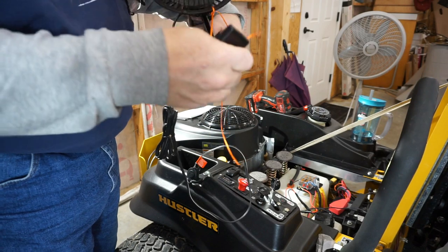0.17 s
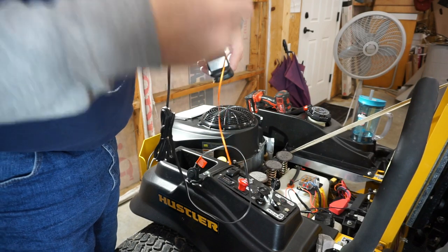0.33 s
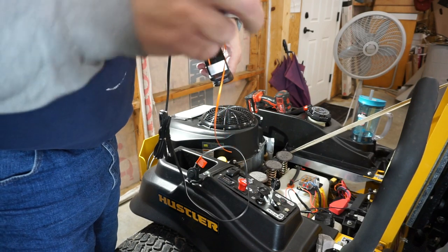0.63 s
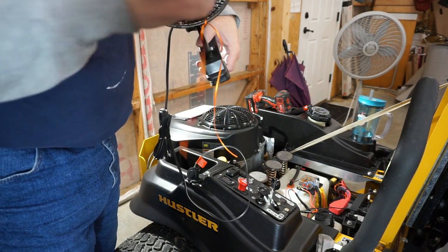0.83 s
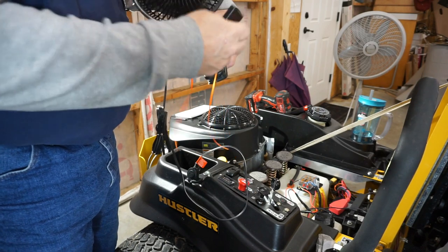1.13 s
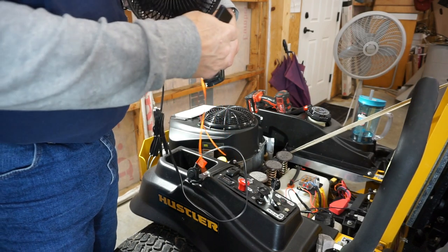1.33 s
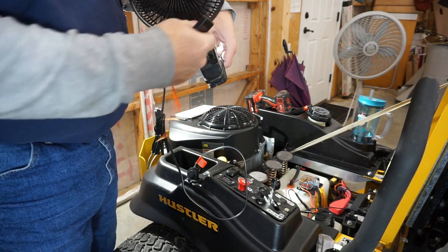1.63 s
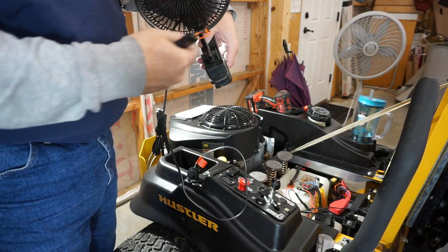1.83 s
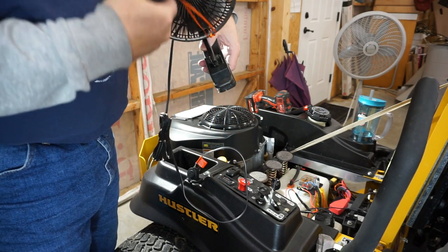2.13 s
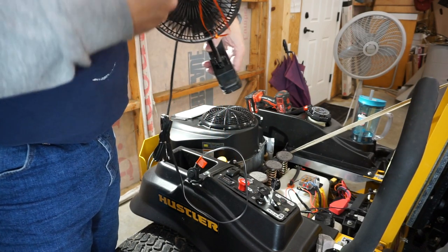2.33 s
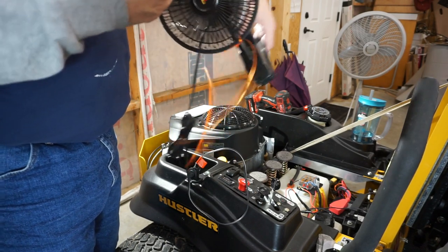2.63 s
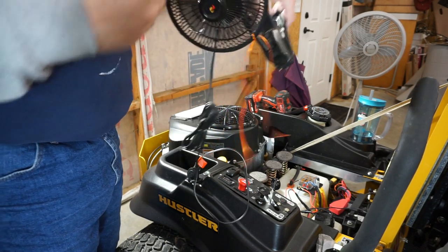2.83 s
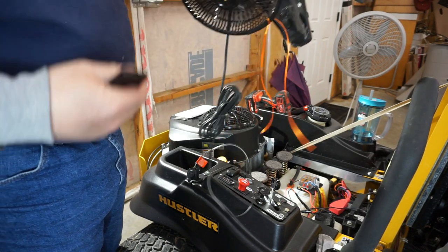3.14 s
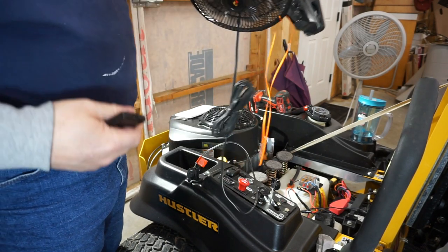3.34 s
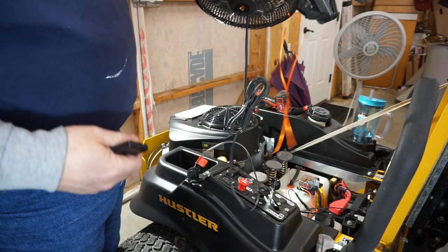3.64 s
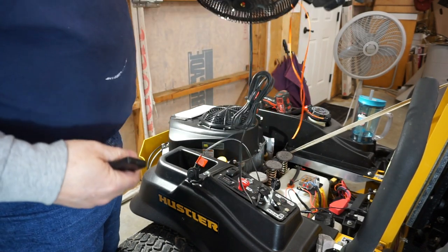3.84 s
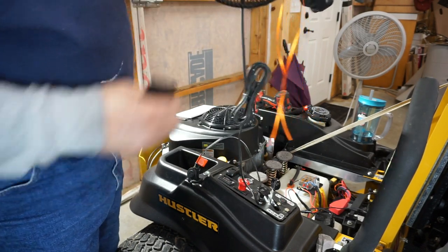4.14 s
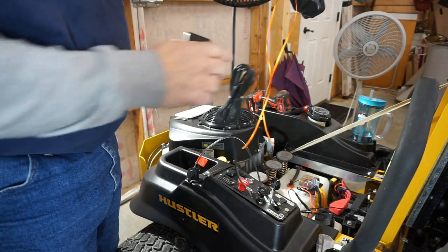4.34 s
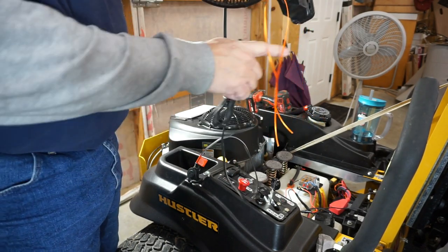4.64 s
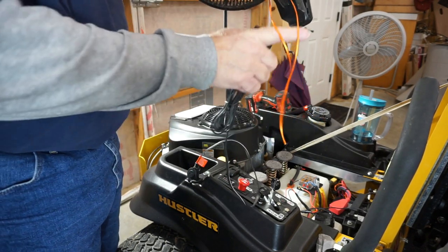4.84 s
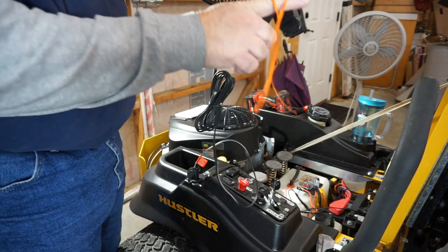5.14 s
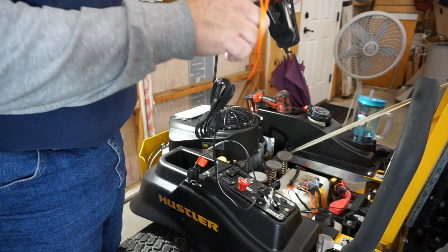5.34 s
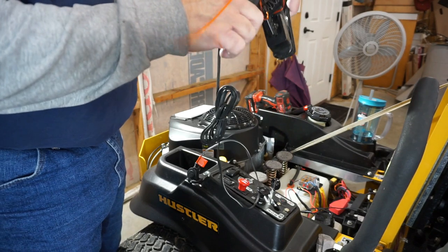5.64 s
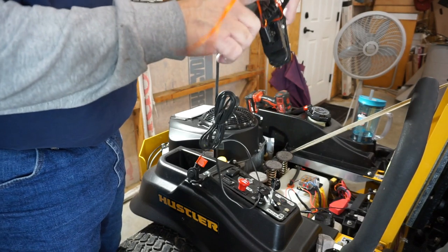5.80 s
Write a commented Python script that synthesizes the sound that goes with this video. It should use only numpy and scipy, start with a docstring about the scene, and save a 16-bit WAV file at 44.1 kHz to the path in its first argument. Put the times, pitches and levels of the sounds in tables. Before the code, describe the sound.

A small hand-held fan whirs close by with a breathy rush and fine ticking, its stream thumping the microphone twice amid light handling knocks.

```python
"""First heard is the rush of air through the guard of a small three-bladed fan, hand-held in a garage.
It is close to a camera's two-port microphone. Noise pulsing with the blades makes the rush, sines on
multiples of the shaft speed the whir and hum, a resonance the swelling ring, a scrape a turn the ticks.
As the man turns the fan, its stream twice sweeps over the microphone and thumps as low noise.
Handling gives noisy clicks and dull decaying bumps; behind it all lies a faint room tone."""
import sys
import numpy as np
from scipy import signal
from scipy.fft import rfft, irfft, next_fast_len
from scipy.io import wavfile
from scipy.ndimage import uniform_filter1d

SR = 44100
rng = np.random.default_rng(int(sys.argv[2]) if len(sys.argv) > 2 else 0)


def generate_wav(signal):
    """Clip the signal to [-1, 1] and save it as 16-bit WAV at the path in sys.argv[1]."""
    frames = np.transpose(np.atleast_2d(signal))
    scaled = np.clip(frames, -1, 1) * 32767
    pcm = np.round(scaled).astype(np.int16)
    wavfile.write(sys.argv[1], SR, pcm)


N = 263277
TIME = np.arange(N) / SR  # s
BINS = np.fft.rfftfreq(N, 1 / SR)  # Hz

# Every colour table gives a spectrum's shape: its levels are relative, in dB per Hz.
# shaft speed: [t/s, turns per second/Hz]
SHAFT_SPEED = [(0, 41.01), (.9, 41.01), (1.2, 41.07), (2.5, 41.03), (3.7, 41.08), (3.95, 41.32),
               (4.4, 41.32), (4.9, 41.25), (5.5, 41.18), (5.97, 41.18)]
WOBBLE_TURNS = 0.002  # the shaft runs slightly unevenly, which blurs its highest overtones

# body of the air through the guard, before the offset in air(): [t/s, level/dB]
AIR_BODY = [(0.0, -44.5), (3.44, -42), (3.84, -43.5), (4.52, -40.5), (5.87, -41.5), (5.97, -40)]
# hiss that the fan beams forward: [t/s, level/dB]
AIR_HISS = [(0, -47), (.3, -47.5), (.8, -54), (1.3, -48), (2.15, -47.5), (2.73, -54), (2.97, -47),
            (3.25, -49), (4, -51.5), (4.35, -43), (4.6, -48), (5.1, -46.5), (5.35, -49), (5.97, -50)]
# colour of the body: [f/Hz, level/dB]
BODY_COLOUR = [(100, -40), (230, -27), (370, -14), (560, -3.5), (760, -3), (900, -1.5), (1250, -2),
               (1700, 0), (2000, -2), (2550, 0), (3300, -2), (4500, -7.5), (6000, -17.5), (11000, -20.5)]
# colour of the hiss: [f/Hz, level/dB]
HISS_COLOUR = [(200, -36), (1000, -41), (2500, -33), (3400, -6), (4550, 0), (5150, -4.5), (5500, 1),
               (6200, -0.5), (7200, -7), (8300, -4), (9300, -3), (10200, -3.5), (11200, -10.5)]
# how far the fan is raised, which changes the side it shows: [t/s, share 0-1]
RAISED = [(0, 0), (2.2, 0.5), (3.1, 0.5), (3.6, 1), (4.05, 1), (4.4, 0.78), (5, .5), (5.97, 0.67)]
# change of the air's colour with the fan fully raised: [f/Hz, level/dB]
RAISED_COLOUR = [(350, -3), (600, -11.5), (900, 4), (1300, -3), (1800, 2), (2400, -1.5), (3250, -5),
                 (4200, 2.5), (6000, 2)]

# weaker shaft overtones, before they follow the body of air: [multiple of shaft speed, level/dB]
WEAK_OVERTONES = [(3, -92.5), (6, -90), (15, -70), (16, -70), (17, -69), (18, -70), (19, -75), (20, -69),
                  (22, -64), (24, -62.5), (25, -66), (26, -63.5), (27, -79), (28, -68.5), (31, -65.5),
                  (33, -68), (34, -67), (36, -63.5), (37, -70), (39, -59), (40, -69), (42, -68),
                  (43, -62.5), (48, -67.5), (54, -61), (56, -63.5), (81, -62), (90, -70), (100, -62.5),
                  (107, -64), (111, -58)]
# strong blade tones: [multiple of shaft speed, level held low/dB, level held high/dB]
BLADE_TONES = [(21, -58, -64.5), (45, -63.5, -53), (60, -60, -59)]
LIFT_S, LIFT_TAKES_S = 3.3, 1.1  # middle and length of the lift
# low motor hum, nine to a turn: [t/s, level/dB]
LOW_HUM = [(0, -58), (.22, -63.5), (.35, -70), (1.1, -70), (1.4, -84), (3.15, -65.5), (3.6, -81),
           (4.8, -73.5), (5.97, -83)]
# higher motor hum, twelve to a turn: [t/s, level/dB]
HIGH_HUM = [(0, -62.5), (1.2, -63), (1.5, -70.5), (2.36, -56.5), (3.15, -66.5), (4, -73), (4.5, -67),
            (5.3, -63), (5.97, -66.5)]

# the housing's ring swells in a steady cycle; lead and trough levels are relative to the large swell
RING_HZ, RING_WIDTH_HZ, RING_FLUTTER_DB = 994, 49, 1
RING_DB, SWELL_FADE_DB_PER_S = -45.5, 0.5
FIRST_SWELL_S, SWELL_EVERY_S, SWELL_HALF_S = 0.798, 0.905, 0.13
LEAD_S, LEAD_HALF_S, LEAD_DB, TROUGH_DB = 0.27, 0.049, -7, -13

# mean level of the rotor's tick; the case is set relative to it: [t/s, level/dB]
TICK_LEVEL = [(0, -54.5), (.7, -56.5), (1.1, -57.5), (1.4, -51), (1.8, -52.5), (1.95, -57.5), (2.7, -60),
              (3.05, -51), (3.4, -56), (3.95, -51), (4.3, -59.5), (4.88, -48), (5.02, -51), (5.4, -50),
              (5.97, -55)]
# colour of the tick: [f/Hz, level/dB]
TICK_COLOUR = [(200, -45), (1500, -27), (4000, -5), (6000, -0.5), (7200, -12), (8300, 0), (9300, 11.5),
               (10200, 4), (11200, -4)]
# colour of the motor case's answer to each tick: [f/Hz, level/dB]
CASE_COLOUR = [(200, -45), (600, -42), (1300, -10), (1750, 5.5), (2200, -2), (3200, -7), (4000, 1.5),
               (4550, 0.5), (5100, -0.5), (6200, -6.5), (7500, -12)]

# the stream brushes the microphone, before its lumpiness: [t/s, peak level/dB, half length/s]
GUSTS = [(2.153, -45, 0.022), (2.242, -43, 0.071), (2.47, -52, .105), (2.928, -37, 0.063), (3.2, -77, 0.23),
         (3.54, -74, .05), (5.94, -72, 0.084)]
# colour of the gusts: [f/Hz, level/dB]
GUST_COLOUR = [(25, -40), (60, -22), (100, -1), (130, -4), (170, 5.5), (230, -1.5), (300, -7), (400, -12),
               (600, -25), (1200, -41)]
# single strong eddies thump on the microphone: [t/s, peak level/dB]
THUMPS = [(2.23, -23.5), (2.396, -36.5), (2.499, -34), (2.922, -31)]
GUST_LUMPY_DB, THUMP_HALF_S = 2, 0.01
# colour of slow, large eddies, which reach both ports alike: [f/Hz, level/dB]
RUMBLE_COLOUR = [(25, -26), (50, -5), (80, 0), (120, 2), (200, -42), (400, -57)]

# clicks from handling the plastic, before their envelopes: [t/s, level/dB, ring f/Hz]
CLICKS = [(.747, -34, 8600), (1.2935, -25, 3860), (1.296, -27, 4100)]
# colour of their snap: [f/Hz, level/dB]
CLICK_COLOUR = [(200, -41), (1000, -8), (2300, 2), (4000, 2), (6000, -1), (7000, -10), (11000, -13)]
# soft bumps of the hands on the fan, before their envelopes: [t/s, level/dB, ring f/Hz]
BUMPS = [(0.619, -48, 366), (1.572, -46.5, 364), (3.129, -44, 376), (3.184, -49, 338), (3.267, -43.5, 402),
         (3.281, -54, 281)]
# colour of the quiet garage: [f/Hz, level/dB]
FLOOR_COLOUR = [(20, -14), (60, 2), (120, -2.5), (180, 3.5), (400, 8), (2000, -14)]

# likeness of the two microphone ports: [f/Hz, correlation]
LIKENESS = [(100, 0.5), (300, 0.6), (600, 0.53), (1100, 0.76), (2200, 0.88), (4000, 0.8), (6500, 0.45),
            (11000, 0.51)]
# balance of the ports: [f/Hz, left-right level/dB]
BALANCE = [(500, 0.9), (2000, 0.4), (3600, 2), (5800, 4), (8000, 1.5), (10000, -1)]
# the fan's place between the ports: [t/s, left-right level/dB]
PLACE = [(0, 1), (1.7, 1.7), (2.3, -0.026), (5.97, -1.1)]
EDGE_HZ = 11200  # upper band limit


def air(turns, body_db=1.5, flutter=0.059, swirl_db=0.95):
    """Turbulence at blades and guard, pulsing as each of three blades passes."""
    body = amp(curve(AIR_BODY) + body_db) * coloured(port_noise(), BODY_COLOUR)
    hiss = amp(curve(AIR_HISS)) * coloured(port_noise(), HISS_COLOUR)
    blades = np.cos(2 * np.pi * 3 * turns)
    swirl = amp(swirl_db * drift(rate=9).real)
    rush = (body + hiss) * (1 + flutter * blades) * swirl
    raised = irfft(rfft(rush) * amp(read(RAISED_COLOUR, BINS)), N)
    return rush + curve(RAISED) * (raised - rush)


def whir(turns, waver=0.6, blade_waver=0.5, apart=0.14):
    """Shaft overtones waver as the fan moves among the room's reflections; motor hums lie below."""
    nearness = evened(amp(curve(AIR_BODY)))
    lifted = np.clip(0.5 + (TIME - LIFT_S) / LIFT_TAKES_S, 0, 1)
    tones = []
    for multiple, db in WEAK_OVERTONES:
        tones.append((multiple, amp(db) * nearness * (1 + waver * drift(rate=1.2))))
    for multiple, low_db, high_db in BLADE_TONES:
        level = amp(low_db + lifted * (high_db - low_db))
        tones.append((multiple, level * (1 + blade_waver * drift(rate=1.197))))
    tones += [(9, amp(curve(LOW_HUM))), (12, amp(curve(HIGH_HUM)))]

    out = np.zeros((2, N))
    for multiple, size in tones:
        tone = np.sqrt(2) * size * np.exp(2j * np.pi * (multiple * turns + rng.random()))
        side = apart * (tone * drift(rate=0.784)).real
        out += [tone.real + side, tone.real - side]
    return out


def housing(turns, rough=0.35):
    """The overtones nearest the housing's resonance ring out, blurred by the air stream."""
    def response(hz):
        """Gain of the resonance."""
        return 1 / (1 + ((hz - RING_HZ) / RING_WIDTH_HZ) ** 2)

    lines = np.zeros(N)
    for multiple in range(20, 30):
        gain = response(multiple * SHAFT_SPEED[0][1])
        lines += gain * np.cos(2 * np.pi * (multiple * turns + rng.random()))
    hz = np.geomspace(300, 3000, 100)
    blur = coloured(port_noise(), np.c_[hz, 20 * np.log10(response(hz))])
    ring = evened(evened(lines) + rough * blur)
    return swells() * amp(RING_FLUTTER_DB * drift(rate=7.4).real) * ring


def swells():
    """Strength of the housing's ring: a small swell and a large one each cycle, slowly fading."""
    cycle = np.zeros(N)
    for s in FIRST_SWELL_S + SWELL_EVERY_S * np.arange(-1, 7):
        cycle += bell(s, SWELL_HALF_S) + amp(LEAD_DB) * bell(s - LEAD_S, LEAD_HALF_S)
    return amp(RING_DB - SWELL_FADE_DB_PER_S * TIME) * (amp(TROUGH_DB) + cycle)


def rotor(turns, case_db=1.1, case_raised_db=7.5):
    """The rotor catches once a turn: a bright tick and a duller case rattle, plainer when raised."""
    tick = coloured(ports(rasp(turns, delay=-0.00075, decay=0.00047, repeat=0.31)), TICK_COLOUR)
    case = coloured(ports(rasp(turns, delay=-0.0002, decay=0.00094, repeat=1.0)), CASE_COLOUR)
    case_gain = amp(case_db + case_raised_db * curve(RAISED))
    return amp(curve(TICK_LEVEL)) * (tick + case_gain * case)


def rasp(turns, delay, decay, repeat):
    """One short scrape a turn (delay and decay in s); part of its grain repeats every turn."""
    shifted = turns - delay * SHAFT_SPEED[0][1]
    age = (shifted - np.floor(shifted)) / curve(SHAFT_SPEED)  # s since the catch
    grain = rng.standard_normal((2, 2048))[:, (age * SR).astype(int)]
    fresh = rng.standard_normal((2, N))
    return (age / decay) * np.exp(-age / decay) * (repeat * grain + fresh)


def gusts(apart=0.88, rumble_db=-42, rumble_follows=0.64):
    """Eddies of the fan's stream push on each microphone port; a weak stream only rumbles."""
    stream = np.zeros(N)
    for s, db, half in GUSTS:
        steeper = 1 + ((TIME - s) / half) ** 2 / 20  # the skirts fall faster than a plain bell
        stream += amp(db) * bell(s, half) ** steeper
    power = (stream * amp(GUST_LUMPY_DB * drift(rate=12).real)) ** 2
    thump_power = sum(amp(2 * db) * bell(s, THUMP_HALF_S) for s, db in THUMPS)
    strength = np.sqrt(power + thump_power)

    mid, side, slow = rng.standard_normal((3, N))
    both = np.array([mid + apart * side, mid - apart * side])
    eddies = signal.hilbert(coloured(both, GUST_COLOUR))
    # dividing by the local level leaves the strength to shape each gust
    local_power = uniform_filter1d(abs(eddies) ** 2, size=700) / 2
    pressure = eddies.real / np.sqrt(local_power + 1e-6)
    rumble_gain = amp(rumble_db) * (strength / strength.max()) ** rumble_follows
    return strength * pressure + rumble_gain * coloured(slow, RUMBLE_COLOUR)


def clicks(rise=0.0003, decay=0.0031, snap=0.55, ring_decay=0.0039):
    """Plastic parts knock together: a noisy snap and a brief ring (times in s)."""
    out = np.zeros((2, N))
    for s, db, hz in CLICKS:
        age = np.maximum(TIME - s, 0)
        burst = snap * np.exp(-age / decay) * coloured(port_noise(), CLICK_COLOUR)
        tone = 0.5 * np.exp(-age / ring_decay) * np.sin(2 * np.pi * hz * age)
        out += amp(db) * (1 - np.exp(-age / rise)) * (burst + tone)
    return out


def bumps(rise=0.0034, decay=0.021):
    """The grip shifts and the fan's frame gives a dull, short ring (times in s)."""
    out = np.zeros(N)
    for s, db, hz in BUMPS:
        age = np.maximum(TIME - s, 0)
        envelope = (1 - np.exp(-age / rise)) * np.exp(-age / decay)
        out += amp(db) * envelope * np.sin(2 * np.pi * hz * age)
    return out


def garage(level_db=-80):
    """A faint low room tone of steady coloured noise."""
    return amp(level_db) * coloured(port_noise(), FLOOR_COLOUR)


def amp(db):
    """Decibels to gain."""
    return 10 ** (np.asarray(db) / 20)


def evened(x):
    """Scales to rms 1."""
    return x / np.sqrt(np.mean(abs(x) ** 2) + 1e-20)


def curve(rows):
    """A table over time, joined by straight lines."""
    return np.interp(TIME, *np.transpose(rows))


def read(points, hz):
    """A table over frequency, joined on a log axis."""
    f, value = np.transpose(points)
    return np.interp(np.log(hz + 1), np.log(f + 1), value)


def bell(s, half):
    """A smooth rise and fall around a moment, of height 1."""
    return np.exp(-((TIME - s) / half) ** 2)


def coloured(x, colour):
    """Filters a sound by a colour table, to rms 1."""
    size = next_fast_len(N + 4096)
    hz = np.fft.rfftfreq(size, 1 / SR)
    return evened(irfft(rfft(x, size) * amp(read(colour, hz)), size)[..., :N])


def ports(pair):
    """Two unrelated sounds become left and right, as alike as direct sound and room make them."""
    size = next_fast_len(N + 4096)
    same = np.clip(read(LIKENESS, np.fft.rfftfreq(size, 1 / SR)), -1, 1)
    gains = np.sqrt([(1 + same) / 2, (1 - same) / 2])
    mid, side = irfft(rfft(pair, size) * gains, size)[:, :N]
    return np.array([mid + side, mid - side])


def port_noise():
    """White noise shared between the two ports."""
    return ports(rng.standard_normal((2, N)))


def drift(rate):
    """Slow complex chance of rms 1: 24 rotations with random speeds, spread by rate in Hz."""
    coarse = np.linspace(0, TIME[-1], 400)
    speed, start = rng.standard_normal(24), rng.random(24)
    slow = np.exp(2j * np.pi * (rate * np.outer(coarse, speed) + start)).sum(1)
    return np.interp(TIME, coarse, evened(slow))


def scene():
    """One shaft drives the fan's running sounds; the gusts arise at the microphone itself."""
    turns = np.cumsum(curve(SHAFT_SPEED)) / SR + WOBBLE_TURNS * drift(rate=5).real
    fan = air(turns) + whir(turns) + housing(turns) + rotor(turns) + clicks() + bumps()
    sides = np.array([[0.5], [-0.5]])  # each port takes half of the left-right difference
    balanced = irfft(rfft(fan) * amp(sides * read(BALANCE, BINS)), N)
    return balanced * amp(sides * curve(PLACE)) + gusts() + garage()


def record(dry):
    """The camera's band limit: a steep low-pass filter."""
    taps = signal.firwin(801, EDGE_HZ, window=("kaiser", 8), fs=SR)
    return signal.oaconvolve(dry, taps[None], "same")


dry = scene()
out = record(dry)
generate_wav(out)
```